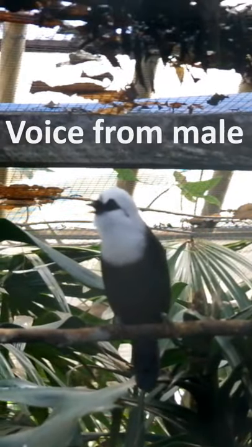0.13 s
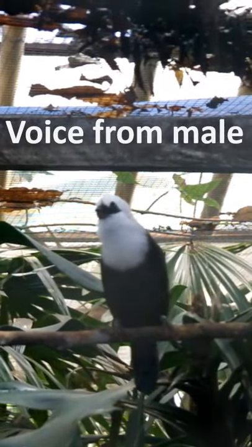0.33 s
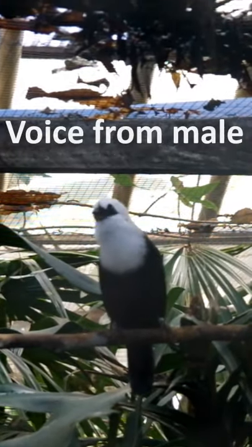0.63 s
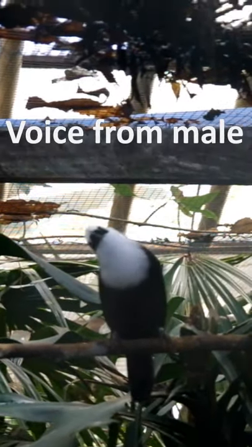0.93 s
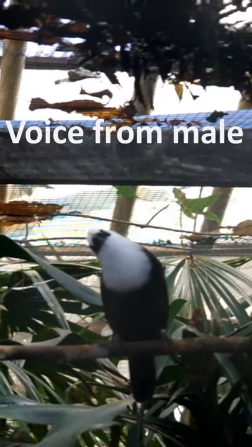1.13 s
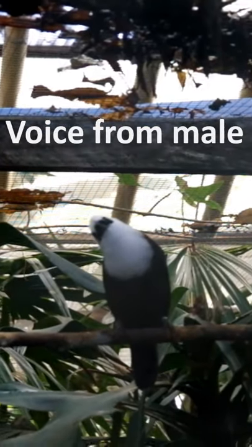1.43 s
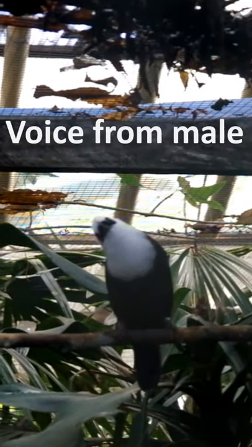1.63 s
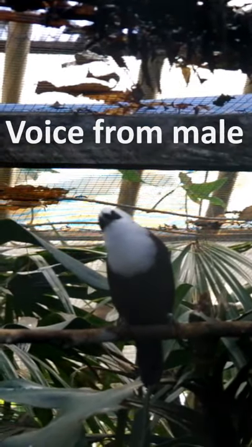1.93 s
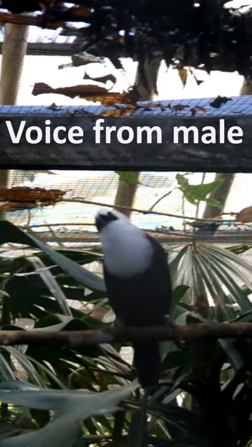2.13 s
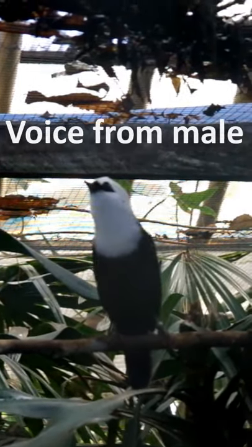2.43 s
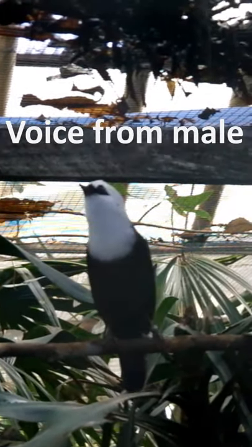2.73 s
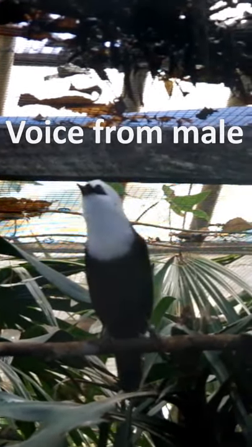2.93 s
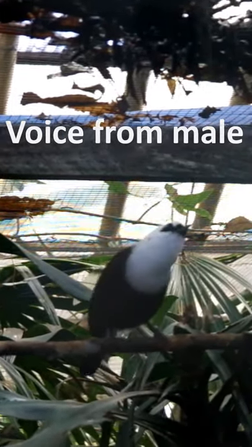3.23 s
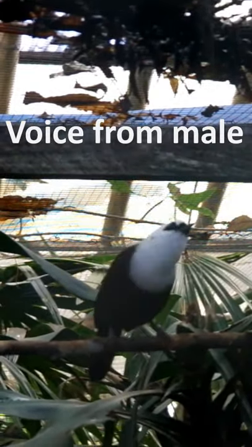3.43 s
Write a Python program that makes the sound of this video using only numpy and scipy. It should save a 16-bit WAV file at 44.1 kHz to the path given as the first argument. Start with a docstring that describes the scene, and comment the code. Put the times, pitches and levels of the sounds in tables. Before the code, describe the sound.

A bird gives a harsh squawk and two loud sliding whistles in an aviary. A second bird's fast, dry chatter runs beneath and carries on alone, followed by two soft nasal mews and faint peeps over a rustling hiss.

```python
"""In a planted aviary, a laughingthrush gives a harsh squawk and two loud sliding whistles.
A second bird's fast dry chatter runs under the whistles and on alone; two soft nasal mews and thin
peeps follow. Each call is syrinx harmonics and rasp, shaped by the throat. Roof and walls throw
the calls back, over a bright, uneven rustling hiss and a low room tone."""
import sys
import numpy as np
from scipy import signal
from scipy.fft import rfft, irfft, next_fast_len
from scipy.io import wavfile
from scipy.ndimage import uniform_filter1d, minimum_filter1d

SR = 44100
rng = np.random.default_rng(int(sys.argv[2]) if len(sys.argv) > 2 else 0)


def to_wav(sig):
    """Store sig (one row per channel, or 1-D mono) as 16-bit WAV at the path in sys.argv[1].

    Samples outside -1..1 are clipped; the rate is SR.
    """
    pcm = np.clip(np.atleast_2d(sig), -1, 1) * 32767
    pcm = np.round(pcm).astype(np.int16)
    wavfile.write(sys.argv[1], SR, pcm.T)  # frames by channels


N = 158319

# EQ of the room tone, the hiss and the rustles: f/Hz, gain/dB
ROOM_TONE_EQ = [(25, 4.5), (60, 2), (150, -5.5), (350, -7.5), (1000, -10), (3000, -19), (12800, -20)]
HISS_EQ = [(60, -25), (120, -10.5), (320, -4.5), (480, -5), (1100, -3.5), (2400, -4), (3600, -5.5),
           (4800, -4), (6000, -5), (8500, -6.5), (11500, -5), (12800, -8)]
RUSTLE_EQ = [(100, -16), (400, -11.5), (1100, -4), (2400, -4), (3600, -5.5), (4700, 0), (6000, -5),
             (8500, -6.5), (11500, -3.5), (12800, -8)]
# fader ride of the hiss: t/s, level/dB
HISS_RIDE = [(0, -49), (.85, -51.5), (1.0, -48), (1.2, -45.5), (1.45, -49.5), (1.7, -46.5), (1.82, -50),
             (1.9, -46.5), (2.02, -51), (2.2, -49), (2.3, -42), (2.42, -47), (2.46, -50), (2.56, -49.5),
             (2.76, -59), (2.88, -57.5), (2.96, -51.5), (3.15, -51), (3.59, -50.5)]
# rustles flaring out of the hiss: t/s, level/dB, 60 dB decay/s
RUSTLES = [(1.605, -42.5, 0.18), (1.75, -48, 0.15), (2.054, -39, 0.3), (2.1, -42, 0.15), (2.182, -40, 0.33),
           (2.47, -44, .5), (2.801, -52, 0.4), (3.08, -50, 0.3), (3.279, -43, 0.27)]

# squawk and whistle gestures: t/s, f/Hz, level/dB, roughness/0-1, high overtones/dB
SQUAWK = [(0.0, 1034, -29, 0.06, -4), (.008, 1037, -16.5, 0.1, -5), (.02, 1042, -11, 0.11, -9.5),
          (.025, 1151, -19, 0.05, 1), (.032, 1278, -12, 0.15, -3), (.044, 1234, -15.5, 0.34, 6),
          (.056, 1181, -14, 0.25, 5), (.064, 1110, -14.5, 0.4, -2.5), (.073, 737, -19.5, 0.42, -4),
          (.08, 680, -35.5, .4, -1.5)]
WHISTLES = [
    [(.122, 1684, -41, 0.25, -6), (.14, 1517, -29, 0.02, -5), (.152, 1393, -24, .1, 0.5),
     (.156, 1371, -19, 0.07, -1.5), (.173, 1368, -17.5, 0.03, -1.5), (.179, 1358, -28, 0.2, 10.5),
     (.192, 1289, -27.5, .15, 7.5), (.199, 1213, -17, .1, -0.5), (.226, 1195, -15.5, .06, 0.5),
     (.231, 1076, -30, 0.2, 1), (.245, 842, -42.5, 0, -5)],
    [(.338, 1736, -37, 0, -3.5), (.354, 1598, -27, 0.3, -2), (.366, 1426, -22, 0.2, -11),
     (.378, 1389, -15.5, 0, -8), (.402, 1376, -29, 0.06, 6), (.413, 1441, -17.5, 0.1, -2),
     (.446, 1487, -23.5, 0.21, 3.5), (.48, 1459, -15.5, 0.04, 1), (.491, 1455, -25, .08, 6),
     (.498, 1430, -37.5, 0, 15.5), (.508, 1445, -15.5, .05, 4), (.548, 1422, -11.5, 0.01, -9),
     (.555, 1409, -26.5, 0, 0.5), (.562, 1403, -16.5, 0, -7.5), (.571, 1405, -29.5, .05, -1),
     (.596, 1416, -25.5, 0.14, -11), (.606, 1400, -53, .1, -12)],
]
# chatter notes: t/s, level/dB, roughness/0-1, f/Hz
CHATTER = [(.115, -31.5, 0.95, 843), (.194, -33, 1, 848), (.27, -31.5, 0.96, 851), (.349, -30.5, 0.8, 848),
           (.431, -31.5, 0.8, 853), (.513, -32, 0.53, 851), (.588, -31.5, 0.83, 850.2),
           (.664, -32, 0.84, 850), (0.744, -32, .75, 858), (0.828, -33, .7, 829.9),
           (.901, -32.5, 0.46, 810.5), (.98, -33.5, 0.56, 817), (1.061, -35, 0.64, 822),
           (1.143, -35.5, 0.65, 813), (1.217, -34, 0.48, 812), (1.299, -36, 0.54, 811),
           (1.381, -35.5, 0.59, 812), (1.462, -35.5, 0.53, 810), (1.542, -34.5, 0.47, 810)]
# envelopes of the two blips in a chatter note: t/s from its onset, level/dB
BLIPS = [
    [(0, -11.5), (.007, -1.5), (.018, -1.5), (.032, -14.5)],
    [(.013, -12), (.023, -1.5), (.038, -2), (.047, -9.5), (.056, -23.5)],
]
# buzz and mew gestures: t/s, f/Hz, level/dB, roughness/0-1
BUZZ = [(.938, 1403, -50, 0.91), (.948, 1353, -41, .8), (.968, 1239, -41, 1), (.982, 1174, -39, 0.9)]
MEWS = [
    [(1.988, 566.4, -51, 0.2), (2.012, 627, -37, 0.21), (2.03, 670, -35.5, .1), (2.06, 660.3, -35.5, .2),
     (2.085, 633, -38, 0.22), (2.112, 616.6, -37, 0.17), (2.135, 607.4, -41.5, 0.42), (2.15, 560, -48, 0.2)],
    [(3.098, 513, -61, 0.3), (3.12, 567, -45, 0.1), (3.138, 609, -38, 0.24), (3.155, 647, -42, 0.4),
     (3.172, 616, -36.5, 0.36), (3.195, 590, -53, .3)],
]
# peeps: t/s, length/s, f/Hz, level/dB
PEEPS = [(2.666, 0.13, 2520, -59.5), (2.904, .11, 2503, -58.5), (3.112, 0.113, 2513, -60)]

# throat EQ on each call's harmonics and on its rasp (one for both in the buzz): f/Hz, gain/dB
SQUAWK_THROAT = [(700, -32.5), (1150, -35.5), (1500, -4), (2050, 0.5), (2550, -1.5), (3100, -22.5),
                 (4000, -37.5), (5100, -20), (6300, -22.5), (8200, -34), (9300, -11.5), (9900, -16.5),
                 (10600, -33), (12800, -28)]
SQUAWK_RASP = [(100, -22), (600, -34), (900, -28), (1600, -4.5), (2400, -9), (2900, -27), (4000, -24.5),
               (6300, -14), (8000, -23), (9500, -13), (10600, -23), (12800, -27.5)]
CHATTER_THROAT = [(800, -20.5), (1150, -34), (1600, 0), (2230, -2.5), (2500, -17), (3250, -15),
                  (3900, -48.5), (5200, -28), (6500, -41), (8200, -17), (9100, -35), (10200, -34),
                  (12800, -50)]
CHATTER_RASP = [(150, -56), (550, -27), (850, -21), (1150, -19.5), (1650, 2), (2000, -4.5), (2400, -5),
                (2750, -9.5), (3350, -7.5), (3900, -31.5), (5200, -18.5), (6500, -30), (7500, -28),
                (8200, -16.5), (9100, -26.5), (10400, -20), (12800, -31)]
WHISTLE_THROAT = [(850, -6), (1200, -0.5), (1700, 0), (2400, -48), (2900, -27.5), (4200, -37), (5000, -52),
                  (5850, -24.5), (7200, -22.5), (8500, -35.5), (9700, -42), (11600, -37.5), (12800, -35)]
WHISTLE_RASP = [(150, -34), (350, -23), (700, -27), (1400, 13), (3000, -4), (3900, -20), (6000, 0),
                (7200, -2.5), (8600, -3.5), (9600, -13), (11600, -10), (12800, -10)]
BUZZ_EQ = [(1200, -35), (1900, -10), (2200, -1), (2700, -4), (3100, -12), (3800, -32), (12000, -40)]
MEW_THROAT = [(600, -25.5), (1220, -0.5), (1900, -4), (2550, -22), (3300, -32.5), (6000, -38.5),
              (12000, -46)]
MEW_RASP = [(150, -45), (600, -20), (1500, 6), (2100, -5), (3200, -19), (12000, -31)]
PEEP_THROAT = [(2500, -26), (5000, 0), (7500, -1), (10000, -23.5)]
PEEP_RASP = [(1000, -51), (4200, -24), (5000, -1), (5700, -24), (6800, -24), (7500, -4.5), (8200, -31),
             (12000, -33)]

# early reflections off roof and walls: delay/s, gain
ECHOES = [(.0095, 0.27), (0.0189, -0.2), (.028, 0.17), (.042, 0.2), (.071, 0.1)]
# reverb time of the aviary: f/Hz, 60 dB decay/s
REVERB_T60 = [(300, 0.33), (1400, 0.28), (2500, 0.6), (7000, 0.22), (12000, 0.25)]

OVERTONES_FROM_HZ, HIGH_CUT_HZ = 3600, 12760


def amp(db):
    """Decibels to gain."""
    return 10 ** (np.asarray(db) / 20)


def read(points, hz):
    """Reads a curve on a log-frequency axis."""
    f, value = np.transpose(points)
    return np.interp(np.log(hz + 1), np.log(f + 1), value)


def add(mix, start_s, sound):
    """Drops a sound into the mix."""
    part = mix[max(round(start_s * SR), 0):][:len(sound)]
    part += sound[:len(part)]


def white(size):
    """White noise."""
    return rng.standard_normal(max(size, SR // 2))[:size]


def wander(step_s, size):
    """Random modulation that glides to a new value every step."""
    return np.interp(np.arange(size) / SR / step_s, np.arange(size), white(size))


def coloured(x, eq):
    """Runs a signal through an EQ curve and sets it to rms 1."""
    size = next_fast_len(len(x), True)
    bins = rfft(x, size)
    hz = np.arange(len(bins)) * SR / size
    shaped = irfft(bins * amp(read(eq, hz)), size)[:len(x)]
    return shaped / np.sqrt(np.mean(shaped ** 2) + 1e-20)


def room_tone():
    """The low, steady background of the house."""
    return amp(-62.5) * coloured(white(N), ROOM_TONE_EQ)


def rustling_hiss():
    """A grainy, bright noise bed that drifts in level, with short brighter rustles on top."""
    attack_s, hold_s, grain_db, grain_s = .0074, .019, .97, .0033
    t = np.arange(N) / SR
    bed = amp(np.interp(t, *np.transpose(HISS_RIDE))) * coloured(white(N), HISS_EQ)
    flare_power = np.zeros(N)
    for start, level_db, t60 in RUSTLES:
        attack = np.clip((t - start) / attack_s, 0, 1)
        decay = np.exp(-np.log(1000) * np.maximum(t - start - hold_s, 0) / t60)
        flare_power += (amp(level_db) * attack * decay) ** 2
    rustles = np.sqrt(flare_power) * coloured(white(N), RUSTLE_EQ)
    return (bed + rustles) * amp(grain_db * wander(grain_s, N))


def syrinx(gesture, throat, rasp, jitter=.03, jitter_s=.001, rasp_db=0, flutter_db=3):
    """One call on its own track: throat-shaped harmonics; roughness shakes them and adds pulsed rasp."""
    flutter_s, fade_s = .006, .002
    times, *columns = np.transpose(gesture)
    t = np.arange(times[0], times[-1], 1 / SR)
    hz, level_db, rough, *optional = (np.interp(t, times, c) for c in columns)
    overtones_db = optional[0] if optional else 0
    level_db = level_db + flutter_db * np.sqrt(rough) * wander(flutter_s, len(t))
    shaken_hz = hz * (1 + jitter * np.sqrt(rough) * wander(jitter_s, len(t)))
    phase = 2 * np.pi * np.cumsum(shaken_hz) / SR
    harmonic = np.arange(1, 17)[:, None]
    harmonic_hz = harmonic * hz
    shelf_db = overtones_db * (harmonic_hz > OVERTONES_FROM_HZ)
    gains = amp(read(throat, harmonic_hz) + shelf_db) * (harmonic_hz < HIGH_CUT_HZ)
    tone = np.sqrt(2) * (gains * np.sin(harmonic * phase)).sum(0)
    puffs = coloured(white(len(t)) * (1 + .5 * np.cos(phase)), rasp)  # one puff per cycle
    blend = np.sqrt(1 - rough ** 2) * tone + amp(rasp_db) * rough * puffs
    fade = np.clip(np.minimum(t - t[0], t[-1] - t) / fade_s, 0, 1)
    track = np.zeros(N)
    add(track, times[0], fade * amp(level_db) * blend)
    return track


def squawk():
    """A harsh burst that lifts, then drops in pitch; the throat favours its second harmonic."""
    return syrinx(SQUAWK, SQUAWK_THROAT, SQUAWK_RASP,
                  jitter=.019, jitter_s=.0007, rasp_db=-1, flutter_db=0)


def chatter():
    """The second bird: about twelve high-low pairs of sagging blips a second, raspy, then clearer."""
    pitch_ratios, sag_per_s = (1.37, 1.01), .7
    out = np.zeros(N)
    for start, level_db, rough, hz in CHATTER:
        for blip, ratio in zip(BLIPS, pitch_ratios):
            onset = blip[0][0]
            gesture = [(start + s, hz * ratio * (1 - sag_per_s * (s - onset)), level_db + db, rough)
                       for s, db in blip]
            out += syrinx(gesture, CHATTER_THROAT, CHATTER_RASP,
                          jitter=.018, rasp_db=-.5, flutter_db=2.5)
    return out


def whistles():
    """Two loud slides carried by the fundamental: the first falls away, the second levels off."""
    return sum(syrinx(gesture, WHISTLE_THROAT, WHISTLE_RASP,
                      jitter=.042, jitter_s=.00075, rasp_db=2, flutter_db=5) for gesture in WHISTLES)


def buzz():
    """One short falling buzz inside the chatter, mostly rasp."""
    return syrinx(BUZZ, BUZZ_EQ, BUZZ_EQ)


def mews():
    """Two soft arches of pitch; harmonics two and three make them nasal."""
    return sum(syrinx(gesture, MEW_THROAT, MEW_RASP,
                      jitter=.045, jitter_s=.0012, rasp_db=-1.5, flutter_db=3.5) for gesture in MEWS)


def peeps():
    """Three thin, breathy high notes that swell and fade as their pitch sags."""
    sag, swell_db, rough = .0396, 6, .86
    out = np.zeros(N)
    for start, length, hz, level_db in PEEPS:
        gesture = [(start + u * length, hz * (1 - sag * u ** 2),
                    level_db - swell_db * (2 * u - 1) ** 2, rough) for u in np.linspace(0, 1, 10)]
        out += syrinx(gesture, PEEP_THROAT, PEEP_RASP,
                      jitter=.022, jitter_s=.0015, rasp_db=1.5, flutter_db=2.5)
    return out


def aviary(calls):
    """Direct sound, early reflections off roof and walls, and a short diffuse tail."""
    predelay_s, wet_db = .008, -13
    out = calls.copy()
    for delay, gain in ECHOES:
        add(out, delay, gain * calls)
    hz, t, noise = signal.stft(white(SR), SR, nperseg=256)
    decay = np.exp(-np.log(1000) * t / read(REVERB_T60, hz)[:, None])
    tail = signal.istft(noise * decay, SR)[1]
    add(out, predelay_s, amp(wet_db) * signal.fftconvolve(calls, tail / np.linalg.norm(tail)))
    return out


def scene():
    """Two birds, one whistling and one chattering, in the aviary's reverb, over hiss and room tone."""
    calls = squawk() + whistles() + chatter() + buzz() + mews() + peeps()
    return (aviary(calls) + rustling_hiss() + room_tone())[None]


def record(dry):
    """Master chain: a fast peak limiter, a steep high cut and a small DC offset."""
    ceiling, window_samples, dc_offset = .42, 130, -.0269
    safe_gain = np.minimum(1, ceiling / (abs(dry) + 1e-9))
    limited = dry * uniform_filter1d(minimum_filter1d(safe_gain, window_samples), window_samples)
    high_cut = signal.firwin(611, HIGH_CUT_HZ, window=("kaiser", 9), fs=SR)
    return dc_offset + signal.oaconvolve(limited, high_cut[None], "same")


dry = scene()
out = record(dry)
to_wav(out)
```